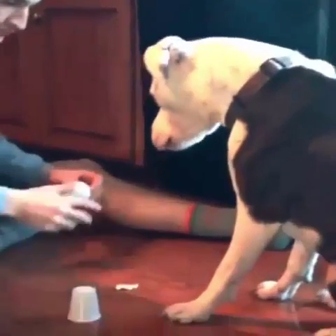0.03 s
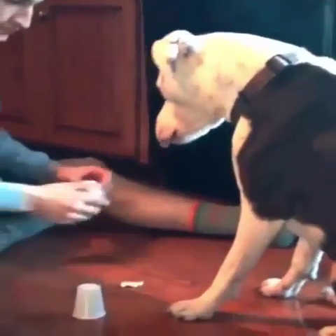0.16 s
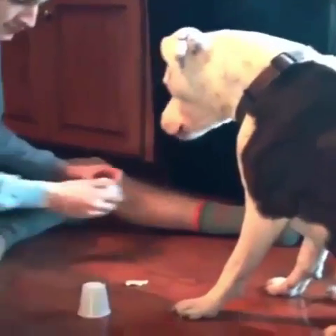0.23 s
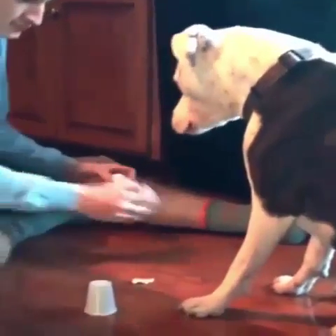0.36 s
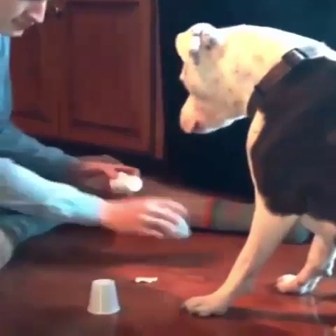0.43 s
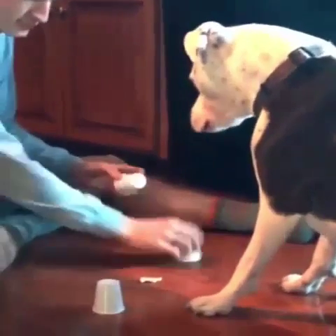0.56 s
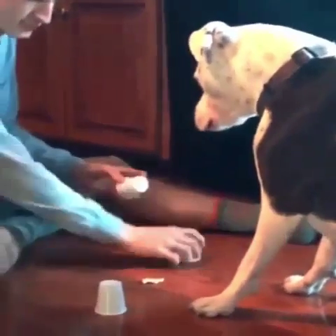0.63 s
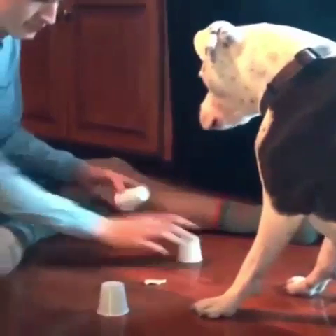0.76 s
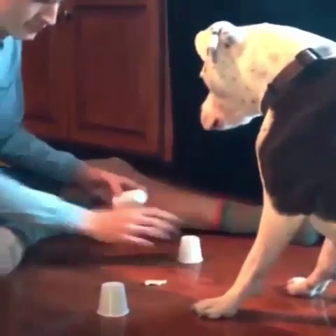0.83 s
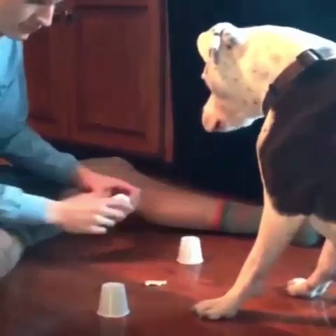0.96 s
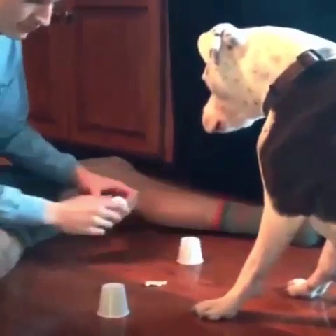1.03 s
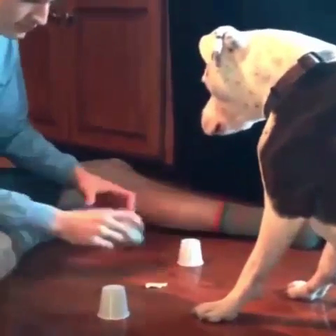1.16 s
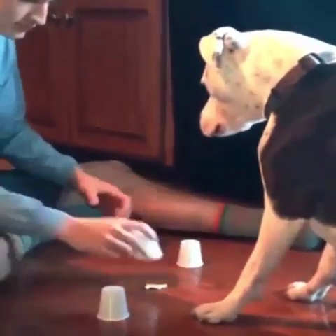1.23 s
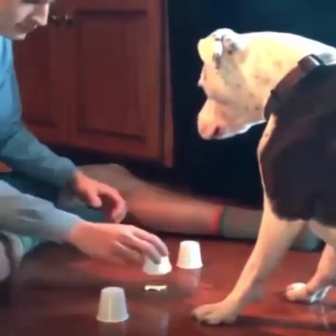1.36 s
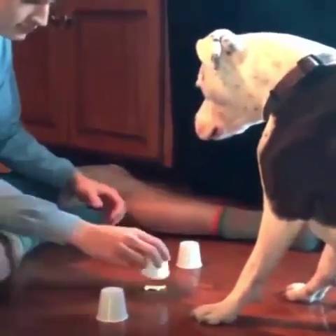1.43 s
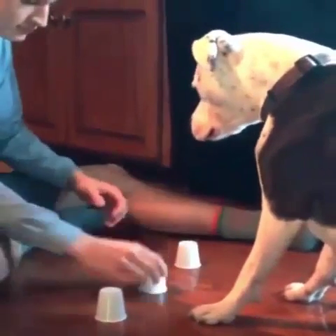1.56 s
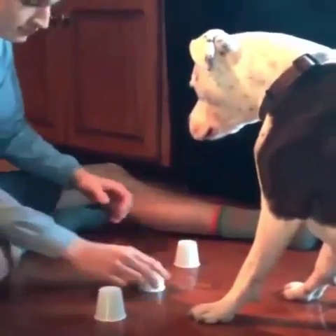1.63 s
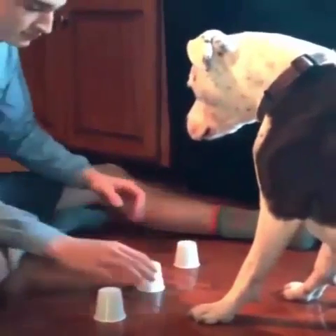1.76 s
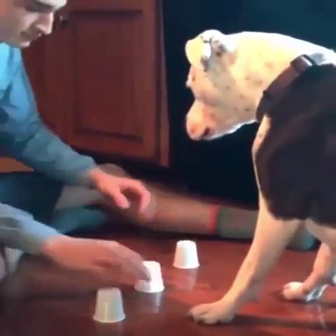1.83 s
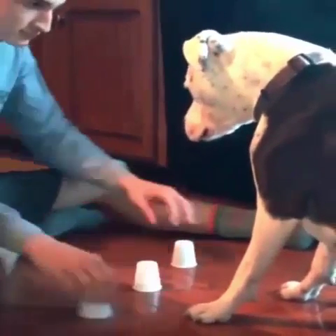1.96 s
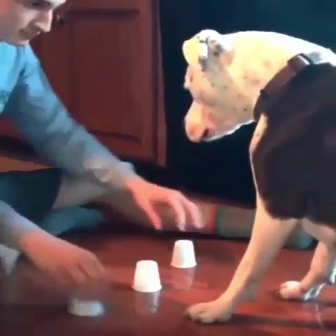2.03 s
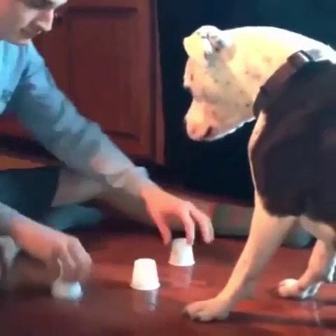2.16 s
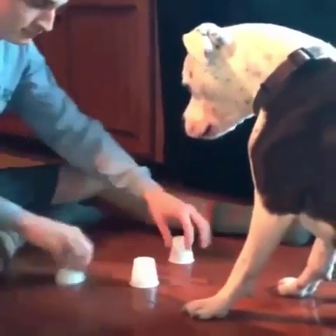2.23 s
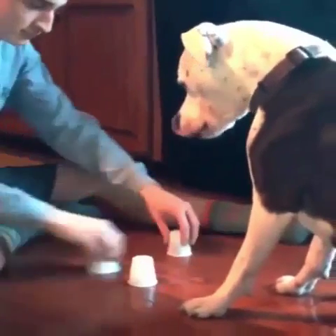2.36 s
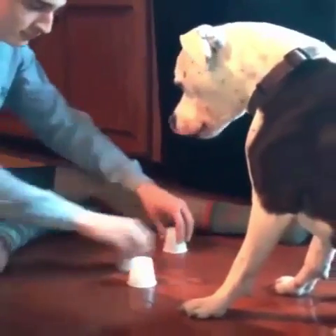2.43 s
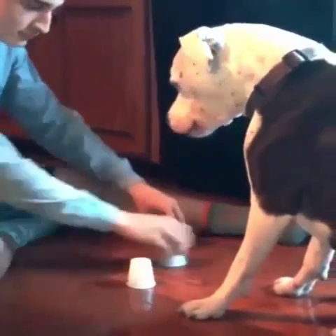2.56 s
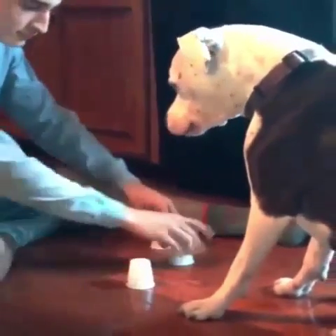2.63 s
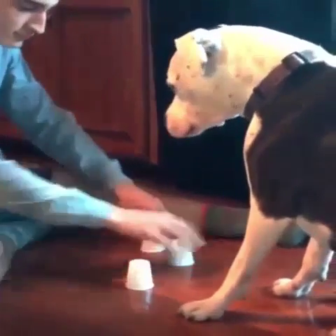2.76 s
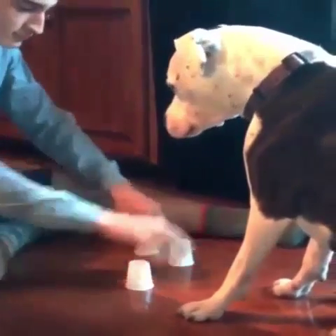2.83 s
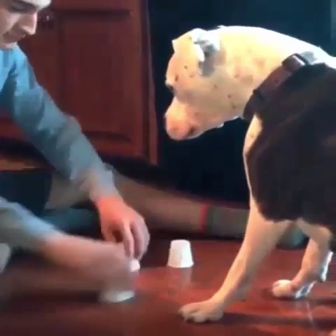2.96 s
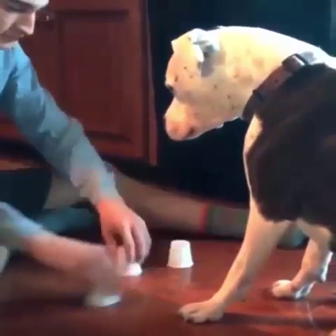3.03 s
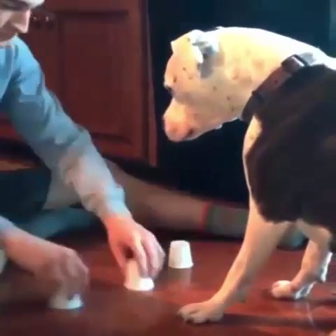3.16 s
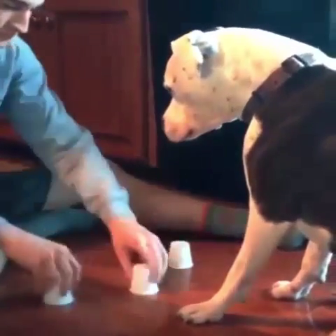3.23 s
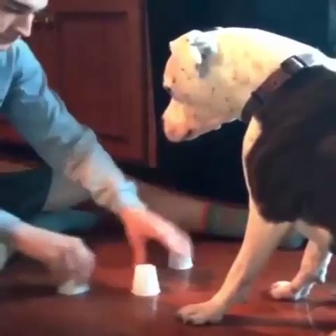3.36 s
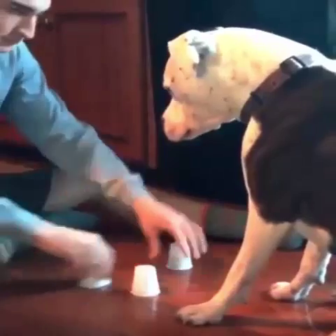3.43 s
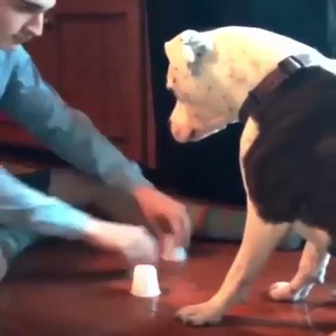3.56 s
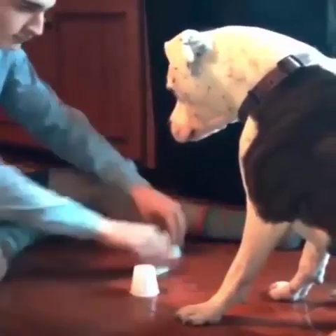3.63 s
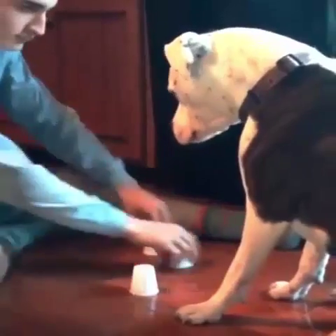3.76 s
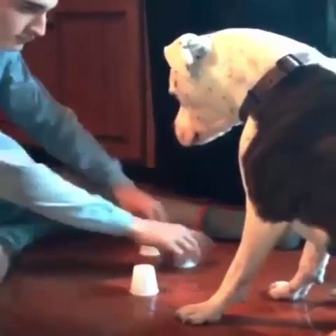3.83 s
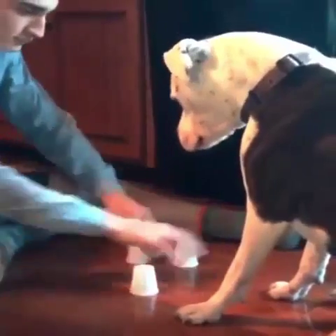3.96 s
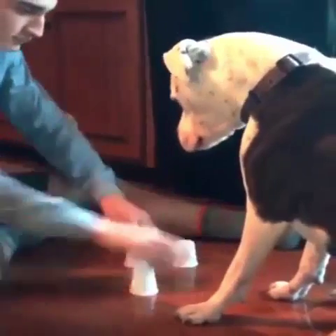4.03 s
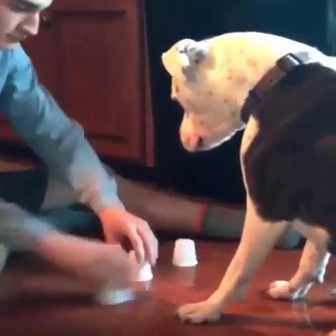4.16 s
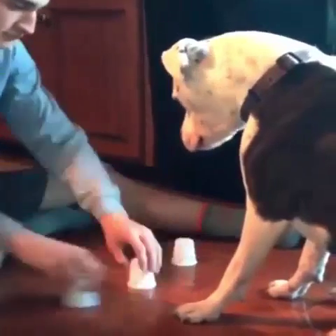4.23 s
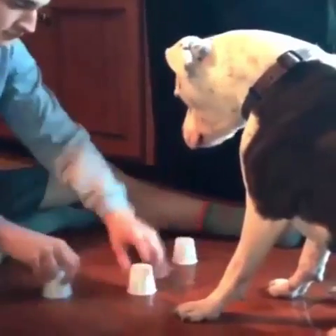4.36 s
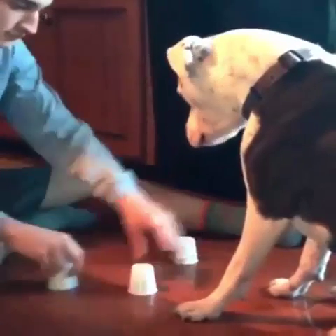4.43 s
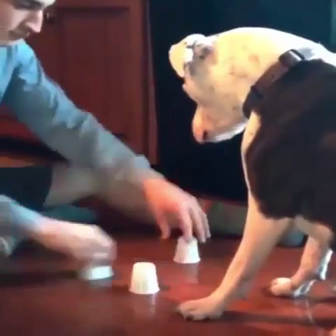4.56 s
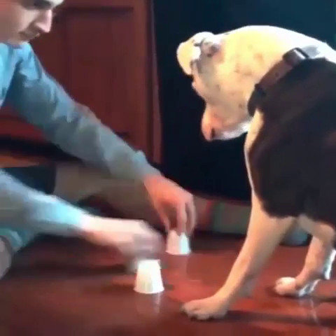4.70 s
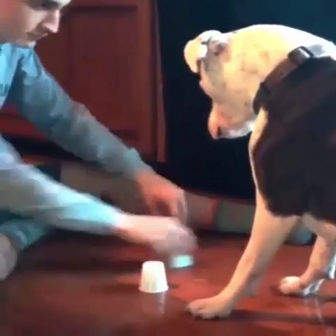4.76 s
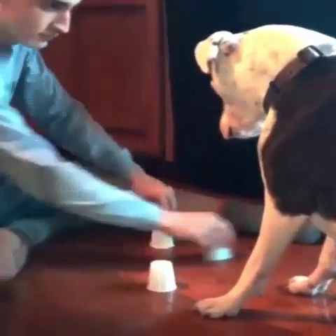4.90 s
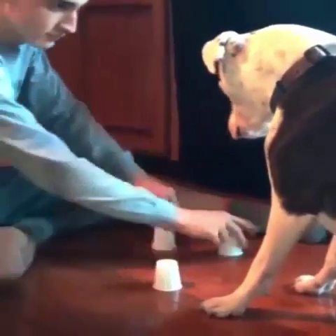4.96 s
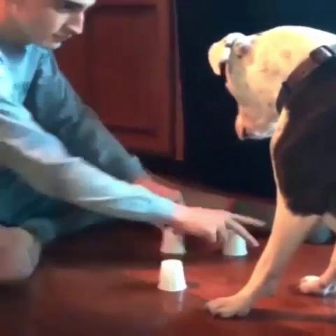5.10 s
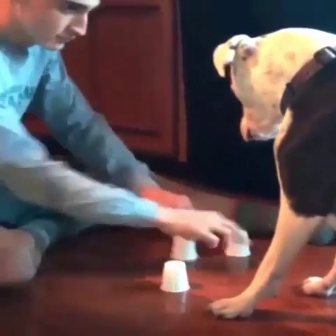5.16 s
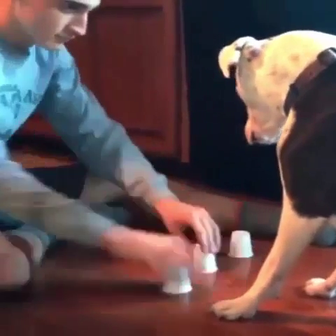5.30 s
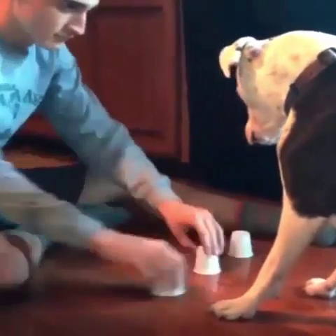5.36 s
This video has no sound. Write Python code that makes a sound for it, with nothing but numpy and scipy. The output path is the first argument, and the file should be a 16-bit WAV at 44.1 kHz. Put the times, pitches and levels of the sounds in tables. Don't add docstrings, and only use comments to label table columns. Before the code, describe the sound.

Thin plastic cups knock down onto a hardwood floor, then scrape, chatter and clack through quick shuffling strokes in a small echoing kitchen.

```python
import sys
import numpy as np
from scipy import signal
from scipy.fft import rfft, irfft
from scipy.io import wavfile
from scipy.ndimage import uniform_filter1d

SR = 44100
rng = np.random.default_rng(int(sys.argv[2]) if len(sys.argv) > 2 else 0)


def volts_from_decibels(level):
    exponent = np.asarray(level, float) / 20
    return 10 ** exponent


def bounce(signal):
    frames = np.transpose(np.atleast_2d(signal))
    limited = np.clip(frames, -1, 1)
    pcm = np.round(limited * 32767).astype(np.int16)
    wavfile.write(sys.argv[1], SR, pcm)


N = 238845

# (frequency [Hz], level [dB])
AIR_SPECTRUM = [(30, -24), (200, -11), (500, -15.5), (800, -24.5), (3000, -23), (8000, -21.5), (11800, -24),
                (15800, -43)]
# (frequency [Hz], level [dB])
RUMBLE_SPECTRUM = [(30, -18), (62, -1), (130, 2.5), (220, -22)]
# (frequency [Hz], width [Hz], level [dB])
FRIDGE_LINES = [(246.5, 4.6, -76), (322.7, 4, -68.5), (383.4, 4.7, -63), (635, 22, -77.5), (1120, 6, -78.5)]
# (frequency [Hz], time to fall 60 dB [s])
KITCHEN_DECAY = [(150, 0.41), (500, 0.32), (1500, 0.31), (4000, 0.3), (12000, 0.27)]

# (middle [s], length [s], speed level [dB], hand pressure [dB], cup hollow [Hz])
GLIDES = [(.06, .12, -67, 8, 1190), (0.328, 0.15, -50, -29, 890), (2.099, .1, -36, 1.5, 980),
          (2.403, 0.28, -40.5, 5.5, 790), (2.51, 0.17, -45, 2, 855), (2.912, 0.13, -57.5, 16.5, 700),
          (2.997, 0.17, -36, 6.5, 624), (3.193, .18, -36, 3.5, 893), (3.403, 0.17, -45, 8, 890),
          (3.502, .16, -44.5, -7, 780), (4.263, 0.15, -39, -14, 910), (4.431, 0.23, -38.5, 0, 795),
          (4.547, 0.2, -48.5, 2, 850), (4.664, 0.18, -43.5, 0.5, 700), (4.951, 0.12, -38, -9, 990),
          (5.394, 0.13, -40, 2, 860)]
# (middle [s], length [s], speed level [dB], hand pressure [dB], cup hollow [Hz])
DRAGS = [(2.25, .22, -38, 9.5, 806), (2.601, 0.19, -44.5, 16.5, 934), (2.791, 0.43, -62.5, 11, 810),
         (3.291, 0.2, -45, 11.5, 826), (3.613, 0.23, -44, 12, 833), (3.758, 0.19, -46, 12.5, 767),
         (3.866, 0.17, -64.5, 15.5, 703), (3.994, 0.22, -61.5, 9.5, 880), (4.047, .1, -56.5, 12, 920),
         (4.152, .24, -43, 17, 896), (4.747, 0.2, -49, 15.5, 705), (4.86, 0.16, -45, 12.5, 758),
         (5.11, .18, -54.5, 1.5, 660), (5.248, 0.25, -53, 15, 680)]
# (frequency [Hz], level [dB])
SCRAPE_SPECTRUM = [(1470, -16), (2500, -11.5), (4290, -11.5), (6660, -9), (10100, -14), (11600, -15.5),
                   (12500, -16.5), (15800, -26)]
# (frequency [Hz], width [Hz], level [dB])
WALL_MODES = [(1790, 50, 5.5), (1410, 160, -10), (2170, 87, 5.5), (2480, 61, -0.5), (3000, 59, -22),
              (3750, 100, -24.5), (4730, 84, -8), (6480, 100, 1.5), (7200, 990, -34)]

# (time [s], peak [dB], air ring [Hz], wall ring [Hz])
CATCHES = [(0.004, -38, 1180, 1560), (0.026, -39.5, 1110, 1210), (0.363, -49.5, 393, 1750),
           (0.748, -25.5, 940, 3020), (0.776, -27, 940, 1520), (1.588, -45, 1100, 1790),
           (1.689, -27.5, 1048, 1790), (2.203, -24, 920, 1350), (2.238, -19.5, 890, 2050),
           (2.39, -27.5, 1190, 1660), (3.588, -27, 900, 2020), (3.615, -16.5, 880, 1765),
           (3.757, -16, 346, 1710), (4.158, -17, 638, 1660), (4.205, -19.5, 640, 1570),
           (4.287, -25.5, 1110, 1410), (4.759, -31.5, 700, 1690), (4.839, -15.5, 820, 1680),
           (4.951, -22, 970, 1860), (5.366, -29.5, 1070, 1400)]
# (time [s], peak [dB], air ring [Hz], wall ring [Hz])
ROCKS = [(0.574, -48.5, 372, 1430), (1.03, -54, 635, 1535), (1.659, -29.5, 1155, 1450),
         (2.269, -25, 828, 2300), (2.58, -23.5, 974, 1310), (2.717, -41.5, 850, 1790),
         (3.707, -22, 645, 1770), (3.968, -44.5, 896, 1840), (4.043, -34.5, 870, 2170),
         (4.086, -19.5, 900, 1440), (4.134, -19, 962, 1710), (4.467, -31, 1080, 1400),
         (4.806, -24.5, 460, 1400), (5.084, -40.5, 635, 1570), (5.222, -34, 610, 1850),
         (5.239, -27.5, 522, 1550)]
# (time [s], peak [dB], air ring [Hz], wall ring [Hz])
CLACKS = [(1.914, -45.5, 405, 1670), (2.066, -28.5, 1090, 1830), (2.085, -16.5, 1140, 1920),
          (2.189, -28, 1100, 1930), (2.609, -19, 1120, 1470), (2.881, -37.5, 624, 2030),
          (2.988, -26, 597, 1760), (3.019, -27.5, 627, 1800), (3.162, -17.5, 875, 1790),
          (3.221, -29, 1010, 1790), (3.275, -22.5, 690, 1790), (3.373, -23, 1200, 1990),
          (3.521, -30, 630, 1680), (3.549, -30.5, 635, 2020), (3.737, -19.5, 370, 1770),
          (4.399, -26.5, 826, 1480), (4.486, -26, 1080, 1590), (4.702, -18, 355, 1470),
          (4.719, -16, 406, 1800), (5.175, -16.5, 990, 1736)]
# (time [s], peak [dB], ring [Hz])
FLEXES = [(.012, -43, 2600), (.362, -40, 5250), (2.0749, -21.5, 2520), (2.2435, -14, 3250),
          (2.38, -27, 3100), (2.5571, -26, 3750), (3.3775, -22.5, 3800), (3.5527, -22, 2620),
          (3.709, -32, 2930), (3.7335, -17, 3100), (3.7538, -32.5, 3100), (4.086, -12, 2630),
          (4.1315, -19.5, 3060), (4.1584, -21, 2800), (4.2092, -33.5, 2740), (4.4901, -29, 2360),
          (4.712, -20, 2430), (4.7792, -25, 3370), (4.8431, -18, 2430), (4.9487, -23.5, 2980),
          (5.3688, -24.5, 2590)]
# (frequency [Hz], level [dB])
RATTLE_SPECTRUM = [(88, -40.5), (150, -14.5), (382, -6), (1180, 2.5), (1710, -7), (3960, -11.5),
                   (7250, -37.5), (15800, -65)]

# (time [s], peak [dB], rim slap re peak [dB], floor thump re peak [dB], chatter length [s])
KNOCKS = [
    (0.686, -5.5, -11.5, -46, 0.0059),
    (1.599, -6, -17, -50.5, 0.0096),
    (2.552, -6.5, -8, -45, 0.0047),
    (2.947, -12, -30, -42.5, 0.0093),
]
# (frequency [Hz], width beyond 70 Hz [Hz], level [dB])
CUP_RINGS = [
    [(567, 31, -2), (927, 26, 1.5), (1524, 18, 2.5), (1770, 27, -4.5), (1990, 34, -14), (2340, 50, -8.5),
     (2980, 140, -4.5), (3700, 40, -34.5)],
    [(622, 36, 2), (1080, 48, 0.5), (1400, 20, 1), (1790, 11, 5), (2070, 65, -32), (2600, 15, -24),
     (2850, 35, -17), (3680, 35, -12)],
    [(330, 53, -11), (974, 36, 0.5), (1310, 24, -6), (1470, 34, -6.5), (1990, 57, -9), (2246, 24, -15),
     (3750, 99, -8.5), (4240, 36, -17)],
    [(383, 39, -15), (630, 21, -3), (1790, 3.5, 7.5), (1970, 44, -23), (2300, 23, -27.5), (2620, 30, -15.5),
     (2800, 30, -9), (3600, 53, -14.5)],
]
# (frequency [Hz], level [dB])
SLAP_SPECTRUM = [(88, -82), (150, -40.5), (522, -4.5), (1380, -1.5), (1600, -9.5), (2080, -4), (8310, -4.5),
                 (15800, -54.5)]
# (time [s], peak [dB], note [Hz])
THUDS = [(1.03, -46.5, 635), (1.323, -55.5, 635), (2.2, -38, 392), (2.29, -26, 818), (2.355, -46, 357),
         (3.25, -29.5, 705), (3.372, -37, 360), (3.705, -24.5, 385), (3.41, -38, 620), (3.865, -60, 370),
         (4.207, -27, 355), (4.485, -32.5, 632), (4.675, -41, 690), (4.7, -31.5, 356), (4.952, -33, 425),
         (5.005, -42.5, 302), (5.175, -27, 395), (5.27, -38, 510)]
# (start [s], end [s])
DROPOUTS = [(.5848, .6872), (1.816, 1.9142), (3.046, 3.1448), (4.2995, 4.3998)]


def evened(x):
    return x / np.sqrt(np.mean(x ** 2) + 1e-20)


def read(points, hz):
    f, value = np.transpose(points)
    return np.interp(np.log(hz + 1), np.log(f + 1), value)


def coloured(x, points):
    gain = volts_from_decibels(read(points, np.fft.rfftfreq(len(x), 1 / SR)))
    return irfft(rfft(x) * gain, len(x))


def resonate(x, hz, width):
    turn = np.exp(2j * np.pi * np.cumsum(hz * np.ones(len(x))) / SR)
    r = np.exp(-np.pi * width / SR)
    return 2 * (turn * signal.lfilter([1 - r], [1, -r], x / turn + 1e-18)).real


def wall(x, squeeze=1):
    return evened(sum(volts_from_decibels(db) * evened(resonate(x, hz * squeeze, width)) for hz, width, db in WALL_MODES))


def swell(noise, swell_s):
    u = np.arange(noise.shape[1]) / SR / np.clip(swell_s, .001, .02)
    return noise[0] * volts_from_decibels(3 * abs(noise[1])) * u ** 0.85 * np.exp(-1.3 * u)


def flattened(x):
    z = rfft(x)
    power = uniform_filter1d(abs(z) ** 2, size=11)
    return irfft(z / np.sqrt(power)) * np.linspace(1, 0, x.shape[-1]) ** 4


def strike(start_s, db, drive, parts):
    out = np.zeros(N + len(drive))
    out[round(start_s * SR):][:len(drive)] = sum(volts_from_decibels(db + d) * p / abs(p).max() for d, p in parts)
    return out[:N]


def bursts(rows):
    return zip(rows, rng.standard_normal((len(rows), 2, 4096)))


def background():
    noise = rng.standard_normal((3, N))
    air = volts_from_decibels(-62) * evened(coloured(noise[0], AIR_SPECTRUM))
    fridge = sum(volts_from_decibels(db) * evened(resonate(noise[1], hz, width)) for hz, width, db in FRIDGE_LINES)
    return air + fridge + volts_from_decibels(-69) * evened(coloured(noise[2], RUMBLE_SPECTRUM))


def slides():
    out, size = np.zeros(N + SR), SR // 2
    rows = [(*row, -19.5) for row in GLIDES] + [(*row, -13.5) for row in DRAGS]
    for middle, length, db, press_db, hollow_hz, boards_db in rows:
        grain, noise = rng.standard_normal((2, size))
        big, chance = rng.exponential(1, size), rng.random(size)
        u = np.arange(min(round(length * SR), size)) / SR / length
        fingers = uniform_filter1d(uniform_filter1d(grain[::-1], size=1500), size=1500)
        fingers = evened(fingers)[:len(u)]
        hz = hollow_hz * (1 + 0.055 * (.5 - u) + 0.058 * fingers)
        bumps = volts_from_decibels(2.4 * evened(uniform_filter1d(grain, 600)))
        catches = volts_from_decibels(2.4 * big.clip(max=4)) * (chance < .08)
        slips = (bumps * (.5 + catches) * noise)[:len(u)]
        hollow = 0.42 * evened(resonate(slips, hz, 100))
        shell = 0.43 * wall(slips, (hz / 850) ** 0.16 + .025 * fingers[::-1])
        body = hollow + shell + .5 * evened(resonate(slips, 1390, 760))
        boards = evened(resonate(resonate(slips, 367, 320), 367, 320))
        hiss = volts_from_decibels(-4.5) * evened(coloured(slips, SCRAPE_SPECTRUM))
        pressed = volts_from_decibels(press_db - 5.5) * (evened(body) + volts_from_decibels(boards_db) * boards)
        arch = abs(np.sin(np.pi * u ** 0.85)) ** 1.83
        out[round((middle - length / 2) * SR):][:len(u)] += arch * volts_from_decibels(db) * (pressed + hiss)
    return out[:N]


def kitchen(x):
    out, at = 0, np.arange(80, SR // 2 - 20, 10)
    turn = np.pi * np.arange(N) / SR / .13
    for k in range(3):
        taps = np.zeros(SR // 2)
        taps[at + rng.integers(0, 10, len(at))] = rng.choice([-1., 1.], len(at))
        hz, t, z = signal.stft(taps, SR, nperseg=256)
        decay = volts_from_decibels(-60 * t / read(KITCHEN_DECAY, hz)[:, None])
        tail = signal.istft(z * decay, SR, nperseg=256)[1]
        echo = signal.fftconvolve(x, tail / np.linalg.norm(tail))[:N]
        out = out + np.cos(turn + k * np.pi / 3) * echo
    return out


def jolts():
    out = 0
    kinds = [(ROCKS, 2.4, 0.012), (CATCHES, -9.5, 0.0064), (CLACKS, -16.5, 0.0099)]
    for rows, air_db, swell_s in kinds:
        for (s, db, air_hz, wall_hz), noise in bursts(rows):
            rattle = flattened(swell(noise, swell_s))
            out = out + strike(s, db, rattle, [
                (air_db, resonate(rattle, air_hz, 89)),
                (-6, resonate(rattle, wall_hz, 87)),
                (-14, wall(rattle, 1 + 0.049 * noise[1, 0])),
                (-7, coloured(rattle, RATTLE_SPECTRUM))])
    for (s, db, hz), noise in bursts(FLEXES):
        out = out + strike(s, db, noise[0], [(-9, resonate(swell(noise, .007), hz, 140))])
    return out


def knocks():
    out, thumps, t = 0, 0, np.arange(4096) / SR
    for ((s, db, slap_db, thump_db, length), noise), rings in zip(bursts(KNOCKS), CUP_RINGS):
        chatter = flattened(noise * (1 - np.exp(-t / 0.0027)) * np.exp(-t / length))
        cup = sum(volts_from_decibels(d) * evened(resonate(chatter[0], hz, width + 70)) for hz, width, d in rings)
        slap = coloured(chatter[1] * np.exp(-t / 0.038), SLAP_SPECTRUM)
        hollow = resonate(resonate(chatter[1], 990, 880), 990, 880)
        out = out + strike(s, db, t, [(-4, cup), (slap_db, slap), (-14, hollow)])
        thump = np.sin(2 * np.pi * 35 * t) * np.exp(-t / 0.024)
        thumps = thumps + strike(s, db, t, [(thump_db, thump)])
    return out, thumps


def thuds():
    out = 0
    for (s, db, hz), noise in bursts(THUDS):
        push = flattened(swell(noise, 0.0057))
        out = out + strike(s, db, push, [(0, resonate(resonate(push, hz, 66), hz, 300))])
    return out


def scene():
    rub, bumps = slides(), jolts() + thuds()
    hits, thumps = knocks()
    echo = kitchen(volts_from_decibels(1.5) * hits + volts_from_decibels(-7) * bumps + volts_from_decibels(-4) * rub)
    no_bass = signal.butter(2, 230, "high", fs=SR, output="sos")
    cups = signal.sosfilt(no_bass, hits + bumps + rub + echo)
    shake = uniform_filter1d(abs(bumps + rub), 900) * evened(coloured(rng.standard_normal(N), RUMBLE_SPECTRUM))
    return (cups + thumps + volts_from_decibels(-29.5) * shake + background())[None]


def low_pass(x):
    return signal.sosfilt(signal.butter(12, 16500, fs=SR, output="sos"), x)


def record(dry):
    hz = np.fft.rfftfreq(N, 1 / SR)
    response = np.where(hz > 11840, volts_from_decibels(-7.5), 1) * (hz < 15800)
    x = irfft(rfft(0.47 * np.tanh(dry / 0.44)) * response, N)
    t, gate = np.arange(N) / SR, np.ones(N)
    for start, end in DROPOUTS:
        trail = volts_from_decibels(-30 - 2200 * (t - start).clip(0)) * (t < start + .035)
        gate = np.where((t > start) & (t < end), trail, gate)
    return low_pass(x * uniform_filter1d(gate, 40))


dry = scene()
out = record(dry)
bounce(out)
```